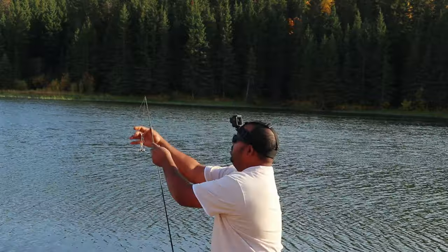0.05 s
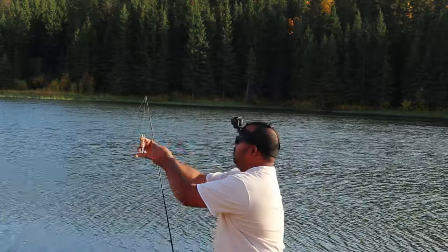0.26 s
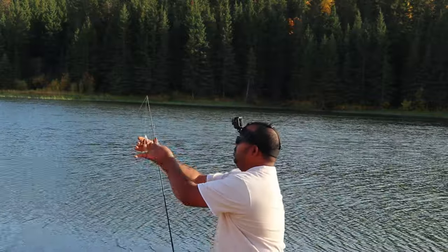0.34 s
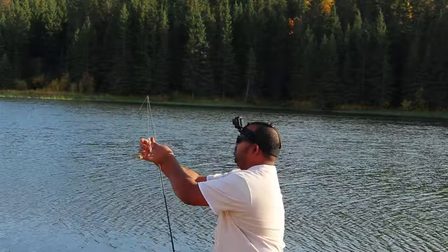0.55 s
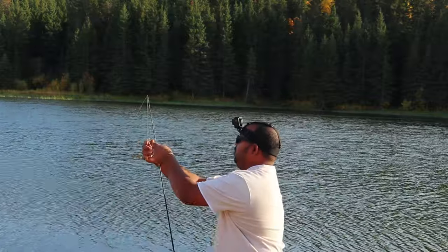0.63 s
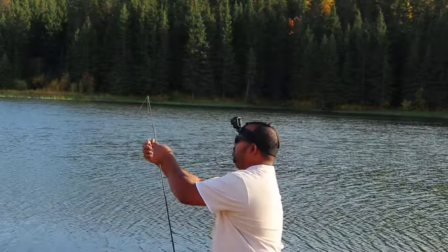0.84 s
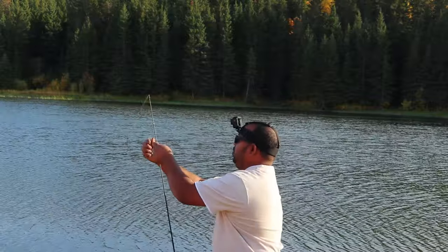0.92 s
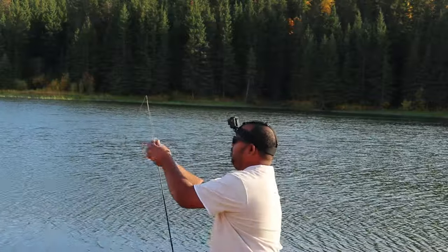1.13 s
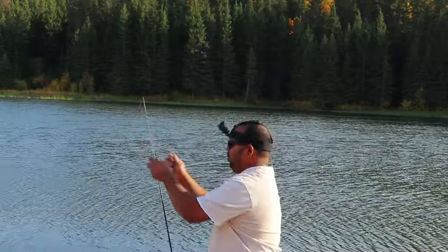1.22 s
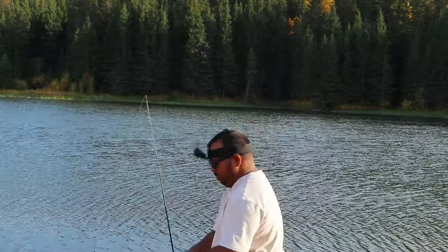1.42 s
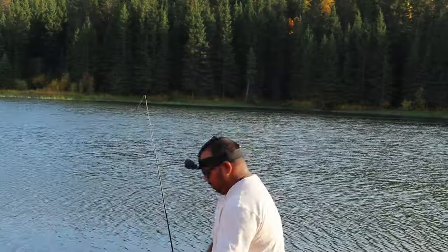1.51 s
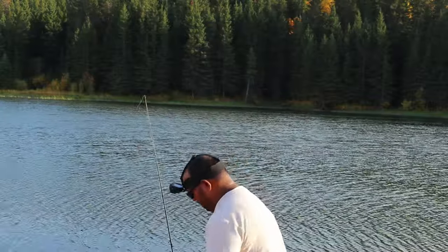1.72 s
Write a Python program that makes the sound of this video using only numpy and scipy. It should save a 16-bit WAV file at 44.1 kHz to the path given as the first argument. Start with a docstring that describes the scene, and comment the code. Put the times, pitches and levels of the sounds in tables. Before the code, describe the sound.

Two small bells tinkle faintly on a fishing rod in brief, damped rings, and their clip clicks and scrapes as it is handled. Outdoors by a lake, wind rumbles and knocks on the microphone, strongest just past the middle.

```python
"""Wind rumbles on the microphone and knocks it with short, dull buffets, while two small bells tinkle
on a fishing rod beside a lake. A pellet strikes each shell; fingers damp the metal, so the rings are
brief and the rolling pellets chatter. The bells' spring clip clicks, pings, knocks and scrapes on the
rod. Underneath lie a soft rustle of cloth and the hush of the air over the water."""
import sys
import numpy as np
from scipy import signal
from scipy.fft import rfft, irfft
from scipy.io import wavfile
from scipy.ndimage import uniform_filter1d

SR = 44100
rng = np.random.default_rng(int(sys.argv[2]) if len(sys.argv) > 2 else 0)


def store_wav(level_fs):
    """Save 16-bit WAV to argv[1]."""
    pcm = np.round(np.clip(np.atleast_2d(level_fs), -1, 1) * 32767)
    wavfile.write(sys.argv[1], SR, pcm.T.astype(np.int16))


N = 77175
T = np.arange(N) / SR

# Modes of the higher and the lower bell, ring tone first.
# Each row: frequency in Hz, level in dB, time to fade by 60 dB in seconds.
HIGH_BELL_MODES = [(4882, 0, .088), (5706, -7, .058), (8860, -24, .05), (11830, -22, .05)]
LOW_BELL_MODES = [(4600, 0, .065), (4450, -8, .04), (4220, -7, .04), (5790, -18, .04), (9980, -22, .07),
                  (11210, -26, .06), (13300, -24, .035)]
# Colour of a click on the metal. Each row: frequency in Hz, spectral level in dB.
CLICK_COLOUR = [(1500, -38), (2800, -27.5), (3400, -11), (3850, 3.5), (4350, 3), (4800, -3.5),
                (5400, -12.5), (6200, -17.5), (7200, -14.5), (16000, -30.5)]


def amp(db):
    """Decibels to gain."""
    return 10 ** (np.asarray(db) / 20)


def unit(x):
    """Scales to rms 1."""
    return x / np.sqrt(np.mean(x ** 2) + 1e-20)


def fader(rows, column=1):
    """Gain at every sample, gliding between rows of seconds and dB."""
    rows = np.array(rows)
    return amp(np.interp(T, rows[:, 0], rows[:, column]))


def add(mix, start_s, sound):
    """Mixes a sound in at its start time."""
    part = mix[..., max(round(start_s * SR), 0):][..., :sound.shape[-1]]
    part += sound[..., :part.shape[-1]]


def coloured(x, colour):
    """Equalises a sound by rows of Hz and dB; white noise keeps its level."""
    hz, db = np.transpose(colour)
    freqs = np.fft.rfftfreq(N, 1 / SR)
    gain = amp(np.interp(np.log(freqs + 1), np.log(hz), db))
    return irfft(rfft(x) * unit(gain), N)


def wide_noise(colour, shared, envelope=1):
    """Stereo noise, shaped in time and then coloured; the channels share part of their power."""
    white = rng.standard_normal((3, N))
    stereo = np.sqrt(shared) * white[0] + np.sqrt(1 - shared) * white[1:]
    return coloured(stereo * envelope, colour)


def steady_noise(colour):
    """Coloured noise with its slow swings ironed out, so that a fader rules its level."""
    x = coloured(rng.standard_normal(N), colour)
    power = uniform_filter1d(uniform_filter1d(x ** 2, 700), 700)
    return x / np.sqrt(abs(power) + 1e-3)


def wobble(rate_hz):
    """Smooth random motion of rms 1, up to about the given rate."""
    rolloff = 1 + (np.fft.rfftfreq(N, 1 / SR) / rate_hz) ** 4
    return unit(irfft(rfft(rng.standard_normal(N)) / rolloff, N))


def flicker(depth_db, rate_hz):
    """A randomly wavering gain of rms 1."""
    return unit(amp(depth_db * wobble(rate_hz)))


def bursts(rows, decay_s, column=1):
    """Envelope of sharp, decaying hits from rows of seconds and dB."""
    out, t = np.zeros(N), T[:SR // 10]
    for row in rows:
        add(out, row[0], amp(row[column]) * np.exp(-t / decay_s))
    return out


def lake_air():
    """The wide, even hush of air over the lake."""
    # Colour of the hush. Each row: frequency in Hz, spectral level in dB.
    hush_colour = [(20, -18.5), (100, -0.5), (300, -8.5), (600, -10), (1000, -14), (2000, -21.5),
                   (3200, -24.5), (5000, -34), (7500, -26.5), (10000, -30.5), (15500, -32)]
    return amp(-56) * wide_noise(hush_colour, shared=0.158)


def cloth():
    """Cloth rustles softly as the arms move."""
    # Swells of the rustle. Each row: time in seconds, level in dB.
    rustle_levels = [(0, -72.5), (.16, -64.5), (.21, -55.5), (.30, -56), (.37, -69), (1.40, -74.5),
                     (1.62, -60.5), (1.75, -68.5)]
    # Its colour. Each row: frequency in Hz, spectral level in dB.
    rustle_colour = [(400, -17), (900, 2), (1600, -1.5), (2300, -7), (3500, -37), (8000, -41)]
    return wide_noise(rustle_colour, shared=0.56, envelope=fader(rustle_levels))


def buffet(db, hz, softness):
    """A dull pressure pulse centred in 60 ms; softness 1 is a hard knock, 4 a rounded swing."""
    t = np.arange(-.03, .03, 1 / SR)
    swing = ((1 - 2j * np.pi * hz * t / softness) ** -(softness + 1)).imag
    return amp(db) * swing / abs(swing).max()


def wind():
    """Lumpy wind and buffets on the microphone; the sheltered left side is softer and duller."""
    # Colours of three layers, low to high. Each row: frequency in Hz, spectral level in dB.
    rumble_colour = [(15, -52), (30, -32.5), (55, -4.5), (85, 1), (150, 5.5), (220, -15.5), (400, -34),
                     (1000, -66)]
    flutter_colour = [(70, -35.5), (150, 2.5), (230, 7.5), (350, -0.5), (480, -9.5), (650, -17),
                      (1000, -28.5), (1600, -43), (3000, -83)]
    gust_colour = [(150, -12.5), (290, 15), (470, 11), (640, 0), (900, -9), (1400, -17.5), (2200, -40.5),
                   (4000, -62)]
    # The bed between the buffets. Each row: time in seconds, rumble in dB, flutter in dB.
    bed_levels = [(0, -79.5, -77.5), (.055, -57.5, -59), (.08, -43.5, -37.5), (.155, -43, -44.5),
                  (.195, -49, -48), (.225, -37.5, -37), (.28, -23.5, -26), (.305, -42.5, -37.5),
                  (.38, -29.5, -36), (.445, -39.5, -42.5), (.485, -29, -39.5), (.54, -24.5, -33.5),
                  (.595, -42.5, -25.5), (.625, -46.5, -40), (.69, -39, -26.5), (.72, -37, -37.5),
                  (.81, -36.5, -41), (.90, -34.5, -27.5), (.96, -35.5, -27), (1.04, -24, -23),
                  (1.075, -26, -24.5), (1.10, -30.5, -23.5), (1.215, -35.5, -28.5), (1.245, -48.5, -43.5),
                  (1.27, -39.5, -30.5), (1.335, -49, -39), (1.41, -39.5, -29), (1.485, -41, -46),
                  (1.51, -36, -36), (1.545, -54, -57), (1.575, -50, -43.5), (1.60, -57, -61.5),
                  (1.635, -47, -47.5), (1.75, -58, -68.5)]
    # The swell of one gust. Each row: time in seconds, level in dB.
    gust_levels = [(0, -78), (.8, -76.5), (.9, -32.5), (.96, -32), (1.0, -21), (1.1, -19.5), (1.17, -24.5),
                   (1.225, -24), (1.25, -46.5), (1.75, -70)]
    # Pressure knocks. Each row: centre in seconds, level in dB, pitch in Hz, softness.
    buffets = [(0.2247, -7, 223.5, 2.59), (.259, -14.5, 199, 2.35), (.277, -14, 169.6, 2.45),
               (0.284, -14, 186, 11.3), (0.322, -18.5, 257.5, 3.68), (0.379, -22, 129, 2.9),
               (0.471, -22.5, 220, 5.2), (0.492, -12.5, 185.5, 1.57), (0.523, -15, 150.4, 1.064),
               (0.588, -13.5, 194, 2.26), (0.594, -20.5, 72.2, 5.9), (0.702, -19.5, 302, 3.67),
               (0.7458, -14.5, 245, 4.69), (.788, -17, 238.3, 5.4), (.831, -16, 256.5, 12.1),
               (0.861, -11.5, 351.5, 4.13), (.898, -14.5, 344, 5), (0.929, -11.5, 314.7, 9.5),
               (0.987, -10.5, 396, 4.7), (.994, -12.5, 386.5, 23), (1.019, -13, 363, 1.75),
               (1.049, -16.5, 232, 2.4), (1.059, -13.5, 320, 2.7), (1.085, -10.5, 425.4, 4.06),
               (1.1174, -6.5, 367.7, 3.6), (1.1528, -7.5, 301, 5.4), (1.178, -20, 446.7, 2.44),
               (1.194, -15, 351, 3.1), (1.215, -10, 279, 5.9), (1.359, -22, 236, 6.27),
               (1.404, -15.5, 324, 8.23), (1.437, -19.5, 317, 7.6), (1.648, -29.5, 307, 7.6)]
    # Hard edges on the sharpest ones. Each row: centre in seconds, level in dB, pitch in Hz.
    snaps = [(.2247, -18, 808), (1.02, -28.5, 940), (1.088, -29.5, 1050), (1.118, -27.5, 882)]
    # The wind's pan. Each row: time in seconds, left fader relative to right in dB.
    pan = [(0, -4.5), (.22, -3.2), (.55, -1.1), (.75, -3.2), (1.03, -4), (1.12, -7), (1.22, -9), (1.3, -4),
           (1.42, -6.2), (1.75, -3.5)]
    snap_softness, low_cut_hz, left_dull_hz = 4.14, 32.6, 620
    x = steady_noise(rumble_colour) * fader(bed_levels)
    x += steady_noise(flutter_colour) * fader(bed_levels, column=2)
    x += steady_noise(gust_colour) * fader(gust_levels) * flicker(depth_db=2.5, rate_hz=110)
    x *= flicker(depth_db=2.2, rate_hz=70)
    for centre_s, db, hz, softness in buffets + [(*snap, snap_softness) for snap in snaps]:
        knock = buffet(db, hz, softness)
        add(x, centre_s - len(knock) / 2 / SR, knock)
    x = signal.sosfilt(signal.butter(2, low_cut_hz, "high", fs=SR, output="sos"), x)
    left = signal.lfilter(*signal.butter(1, left_dull_hz, fs=SR), x)
    balance = fader(pan)
    return np.array([left * balance, x]) * 2 / (1 + balance)


def with_reflections(x):
    """Adds faint reflections from the angler, the bank and the water."""
    t, t60_s, echo_db = T[:SR // 3], 0.193, -13
    tail = rng.standard_normal((2, len(t))) * np.exp(-np.log(1000) * t / t60_s)
    tail /= np.linalg.norm(tail[0])
    return x + amp(echo_db) * signal.fftconvolve(x, tail, axes=1)[:, :N]


def ring(modes, level_db, overtones_db=0, favoured_hz=0, detune=0, damping=1):
    """Struck metal rings; the grip detunes and damps it, and the spot hit favours one overtone."""
    favour_db, spread_rad, rise_s = 11.5, 0.22, 0.00036
    t, out = T[:SR // 5], 0
    favoured = np.argmin([abs(hz - favoured_hz) for hz, _, _ in modes])
    for k, (hz, db, t60) in enumerate(modes):
        grip, spread = rng.standard_normal(2)
        phase = 2 * np.pi * (hz * (1 + detune * grip) * t + rng.random())
        stereo_phase = phase + np.array([[0], [spread_rad * spread]])
        if k > 0:
            db += overtones_db + favour_db * (k == favoured)
        decay = np.exp(-np.log(1000) * damping * t / t60)
        out = out + amp(level_db + db) * decay * np.sin(stereo_phase)
    roughness = 1 + 0.16 * wobble(rate_hz=345)[:len(t)]
    return out * roughness * (1 - np.exp(-t / rise_s))


def rod_clip():
    """The spring clip clicks, pings and scrapes, and the rod knocks hollowly under it."""
    # Dry clicks of clip and held bells. Each row: start in seconds, body in dB, treble in dB.
    clicks = [(.766, -42, -44), (0.7862, -32, -41.5), (.832, -35, -66), (0.837, -37.5, -52.5),
              (.980, -49, -52), (1.0017, -48.5, -40), (1.060, -67, -51), (1.245, -56.5, -48.5),
              (1.256, -56.5, -54), (1.306, -52, -56), (1.349, -46, -63.5), (1.369, -39.5, -64.5),
              (1.378, -46, -60), (1.386, -40, -51), (1.397, -47.5, -53), (1.482, -49.5, -67.5),
              (1.718, -60.5, -51)]
    # Woody knocks and thin pings. Each row: start in seconds, level in dB.
    knocks = [(.897, -49), (1.063, -54), (1.456, -52.5), (1.481, -43.5)]
    pings = [(.7305, -58), (0.7499, -44.5), (0.767, -43.5), (1.2444, -44.5), (1.304, -53.5)]
    # Modes of the spring. Each row: frequency in Hz, level in dB, time to fade by 60 dB in seconds.
    spring_modes = [(13700, 0, 0.028), (13430, -1, 0.02)]
    # Fingers and clip drag along the rod. Each row: time in seconds, level in dB.
    scrape_levels = [(0, -70), (.66, -77), (.72, -58), (.80, -59.5), (.85, -64), (.91, -63.5), (.96, -86),
                     (1.31, -73.5), (1.37, -57.5), (1.42, -64.5), (1.50, -55), (1.53, -58.5), (1.58, -66),
                     (1.63, -67.5), (1.75, -81.5)]
    # Colours of click treble, knock and scrape. Each row: frequency in Hz, spectral level in dB.
    treble_colour = [(2000, -35.5), (4500, -8.5), (6500, 4.5), (8000, 2), (11500, -10), (14000, -21),
                     (16000, -18)]
    knock_colour = [(2400, -25.5), (3100, 1.5), (3550, -0.5), (4200, -17), (9000, -41)]
    scrape_colour = [(2000, -11), (3200, -7), (4300, 1), (5200, -11), (6200, -7), (7500, -27), (15000, -28)]
    click_decay_s = 0.001665
    out = wide_noise(CLICK_COLOUR, shared=0.98, envelope=bursts(clicks, click_decay_s))
    out += wide_noise(treble_colour, shared=0.14, envelope=bursts(clicks, click_decay_s, column=2))
    out += wide_noise(knock_colour, shared=0.894, envelope=bursts(knocks, decay_s=0.0072))
    for start_s, db in pings:
        add(out, start_s, ring(spring_modes, db, detune=.006))
    friction = fader(scrape_levels) * flicker(depth_db=3, rate_hz=250)
    return out + wide_noise(scrape_colour, shared=0.79, envelope=friction)


def rolling_pellets():
    """Pellets roll in the pinched shells: tiny taps, each choked at once, blur into a rattle."""
    # Spells of chatter. Each row: start in seconds, length in seconds, level in dB.
    rolls = [(0.31, 0.049, -53.5), (0.703, 0.0553, -49), (1.355, 0.035, -65), (1.555, 0.042, -52)]
    taps_per_s = 700
    out = np.zeros((2, N))
    for start_s, length_s, db in rolls:
        size = round(length_s * SR)
        taps = rng.standard_normal(size) * (rng.random(size) < taps_per_s / SR)
        taps *= np.sqrt(np.hanning(size))
        choked_ring = ring(LOW_BELL_MODES + HIGH_BELL_MODES, level_db=0, damping=3.5)
        rattle = signal.fftconvolve(taps[None], choked_ring, axes=1)
        add(out, start_s, amp(db) * rattle / (rattle[:, :size].std() + 1e-12))
    return out


def bell(strikes, modes, detune):
    """The pellet hits the shell: a tick of contact, a short buzz and a damped ring."""
    tick = amp(-11.5) * bursts(strikes, decay_s=0.001)
    buzz = amp(-16.5) * bursts(strikes, decay_s=0.0062)
    out = wide_noise(CLICK_COLOUR, shared=0.85, envelope=tick + buzz)
    for start_s, db, overtones_db, favoured_hz in strikes:
        add(out, start_s, ring(modes, db, overtones_db, favoured_hz, detune))
    return out


def bell_pair():
    """Two finger-damped bells tinkle; the lower one strays more in pitch from hit to hit."""
    # Pellet hits on each bell. Each row: start in seconds, level in dB, overtone trim in dB,
    # favoured overtone in Hz.
    high_strikes = [(.1305, -37, -32, 8860), (.238, -53, -20.5, 5700), (.2568, -43.5, 0.5, 11830),
                    (.353, -39.5, 0, 8860), (.413, -42, -21.5, 8860), (.708, -46, -7, 5700),
                    (.721, -43, -9.5, 5700), (.730, -49, 9.5, 5700), (.772, -51.5, 5, 5700),
                    (.7866, -49, 16.5, 8860)]
    low_strikes = [(.16, -58.5, -3.5, 4450), (.216, -56.5, -2.5, 4220), (.3232, -37.5, -22, 4220),
                   (.345, -38, -10.5, 9980), (.655, -55.5, -15, 4450), (.696, -52, -9.5, 4450),
                   (.7225, -33.5, -9, 11210), (.730, -32, -8, 9980), (.766, -42, -2.5, 4220),
                   (.835, -56, 9.5, 11210), (1.209, -46, -29.5, 4450), (1.545, -44, -16.5, 4450),
                   (1.561, -32, -18.5, 9980), (1.573, -37, -9.5, 9980), (1.584, -41.5, -6.5, 11210),
                   (1.687, -50, -3, 4220)]
    high = bell(high_strikes, HIGH_BELL_MODES, detune=.001)
    return high + bell(low_strikes, LOW_BELL_MODES, detune=.006)


def scene():
    """Bells, clip and cloth sit a little to the right, amid the wind and the lake air."""
    metal = bell_pair() + rolling_pellets() + rod_clip()
    rustle = cloth()
    pan_right = amp([[-1.75], [1.75]])
    return (with_reflections(metal) + rustle) * pan_right + wind() + lake_air()


def record(dry):
    """Sound reaches the left microphone a little later, and the very top of the treble is cut."""
    left_lag_s, high_cut_hz = 0.00019, 15850
    delay = np.exp(-2j * np.pi * np.fft.rfftfreq(2 * N, 1 / SR) * left_lag_s)
    left = irfft(rfft(dry[0], 2 * N) * delay)[:N]
    lowpass = signal.firwin(511, high_cut_hz, window=("kaiser", 9), fs=SR)
    return signal.oaconvolve(np.array([left, dry[1]]), lowpass[None], "same")


dry = scene()
out = record(dry)
store_wav(out)
```